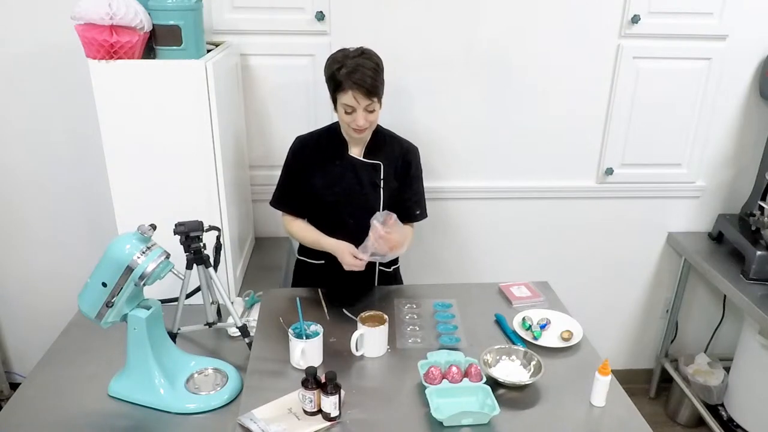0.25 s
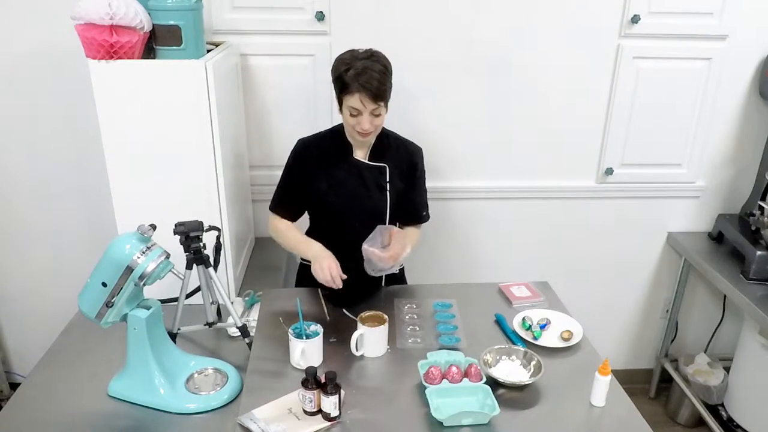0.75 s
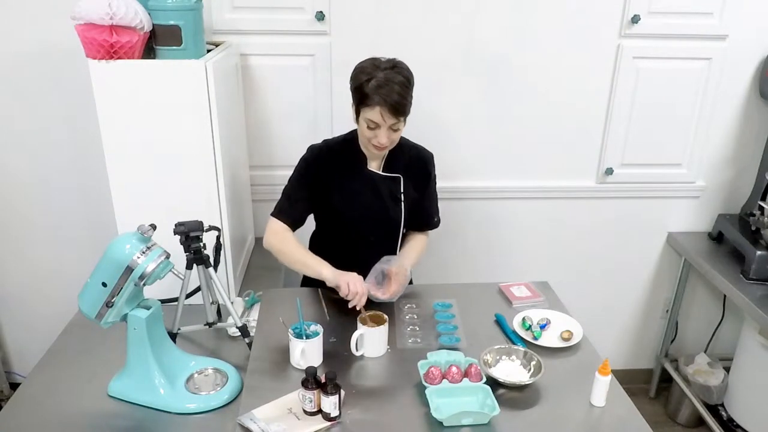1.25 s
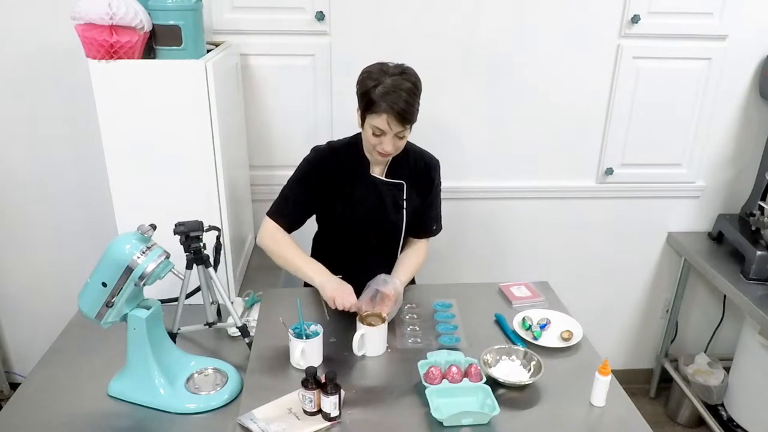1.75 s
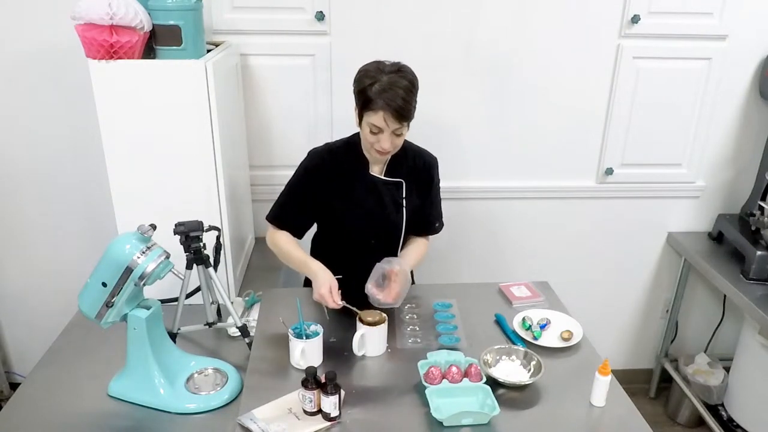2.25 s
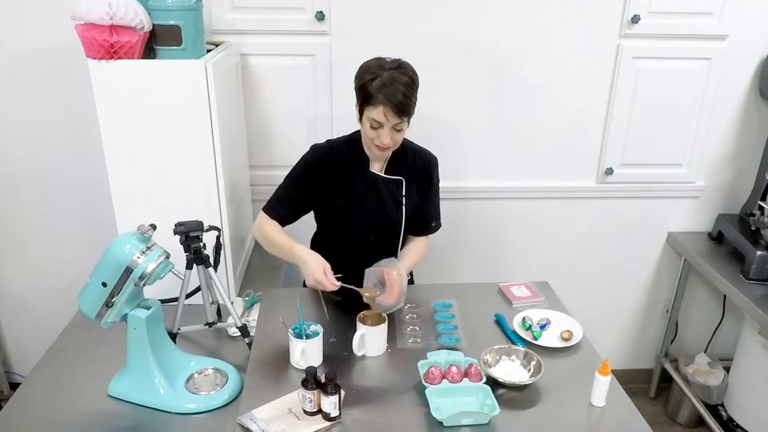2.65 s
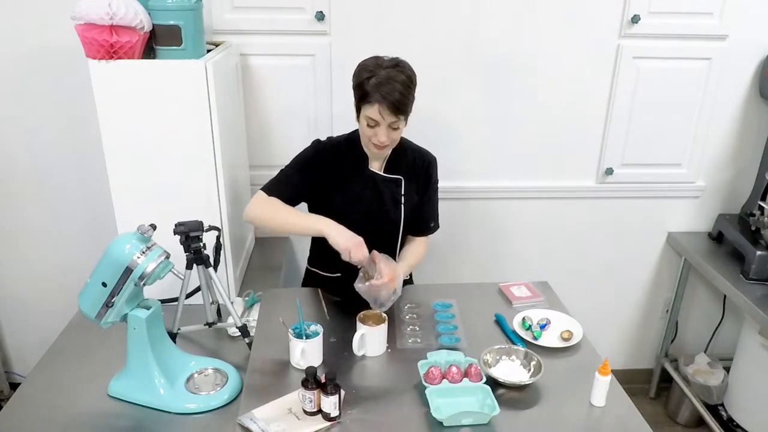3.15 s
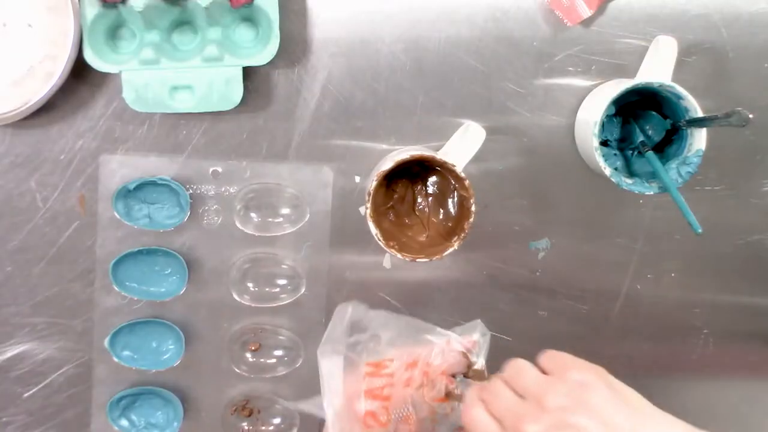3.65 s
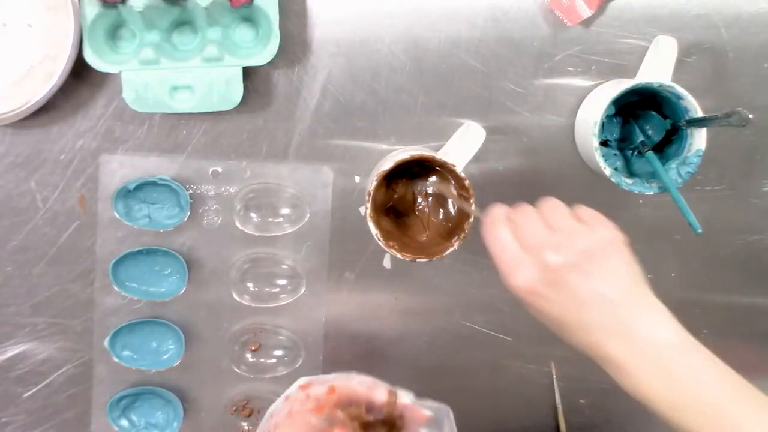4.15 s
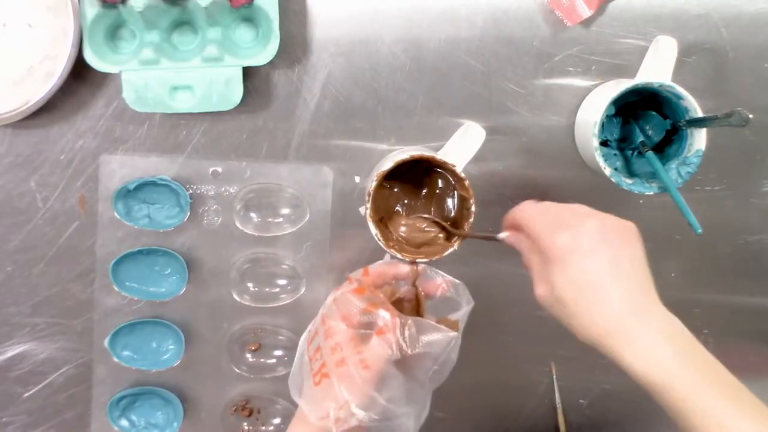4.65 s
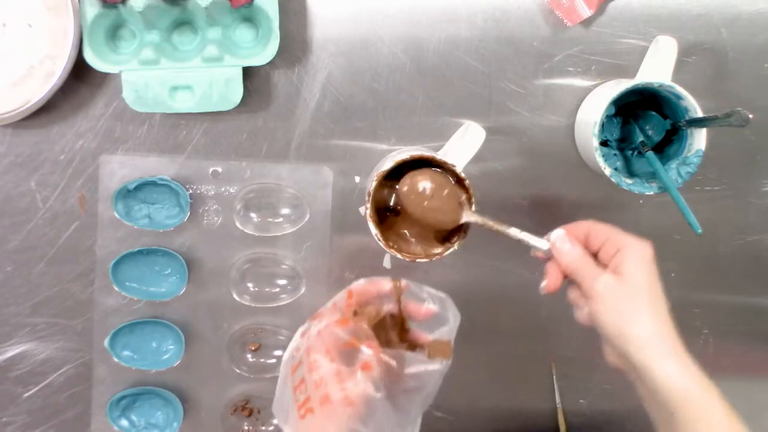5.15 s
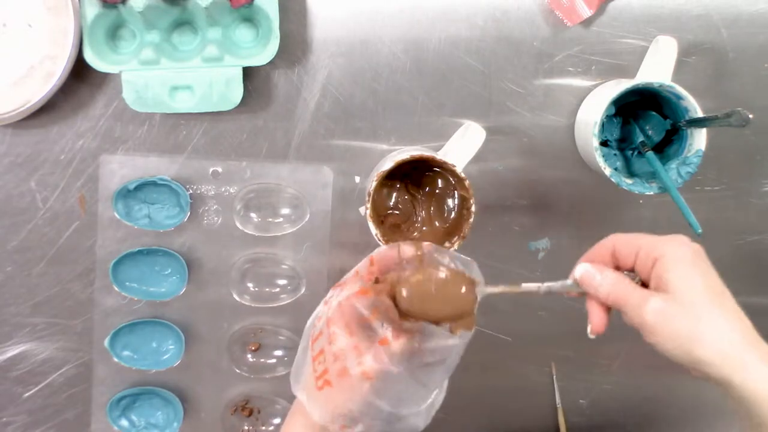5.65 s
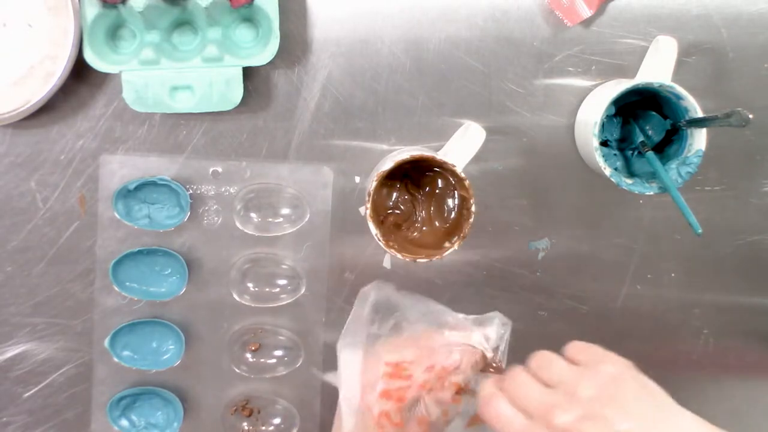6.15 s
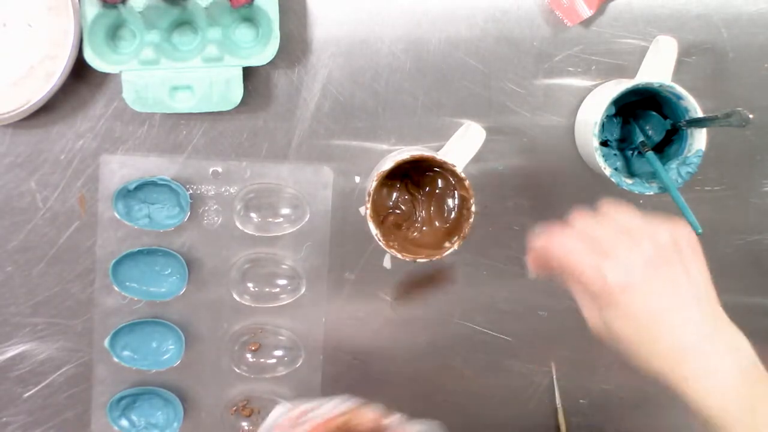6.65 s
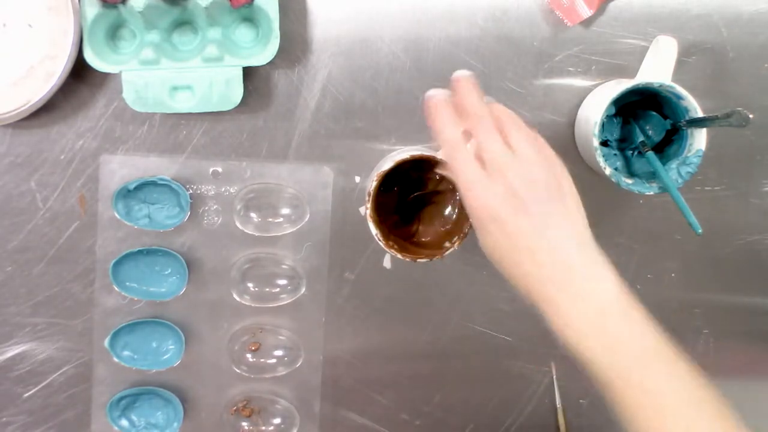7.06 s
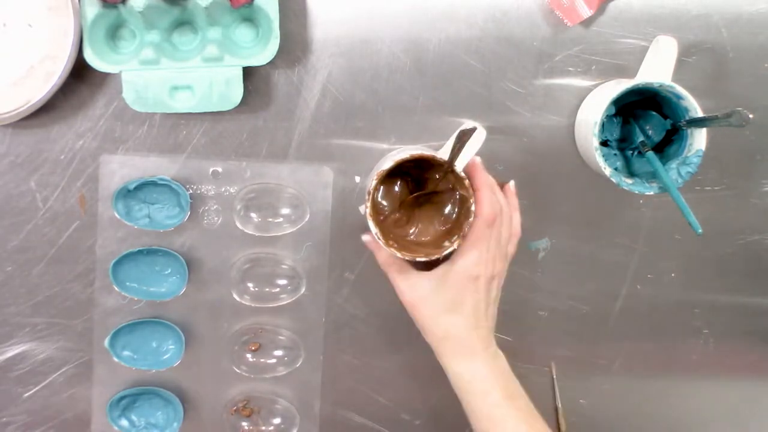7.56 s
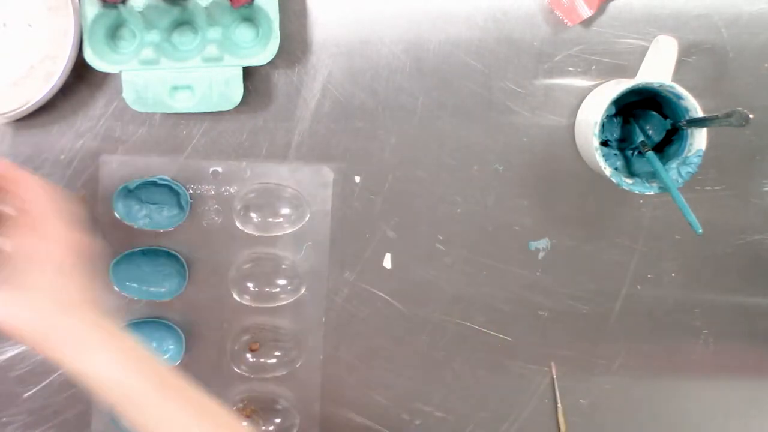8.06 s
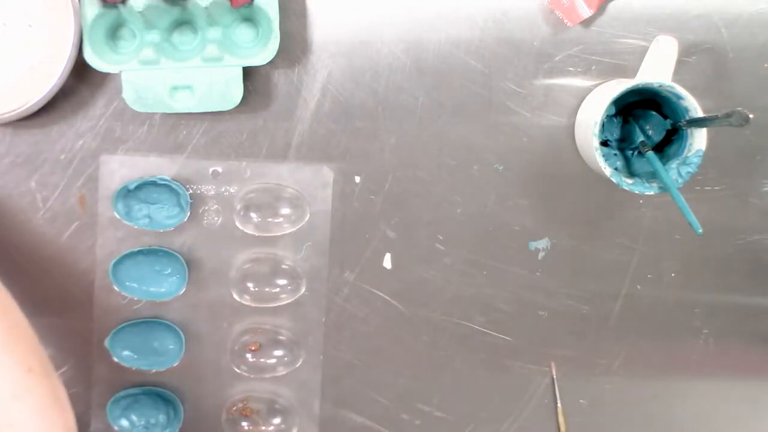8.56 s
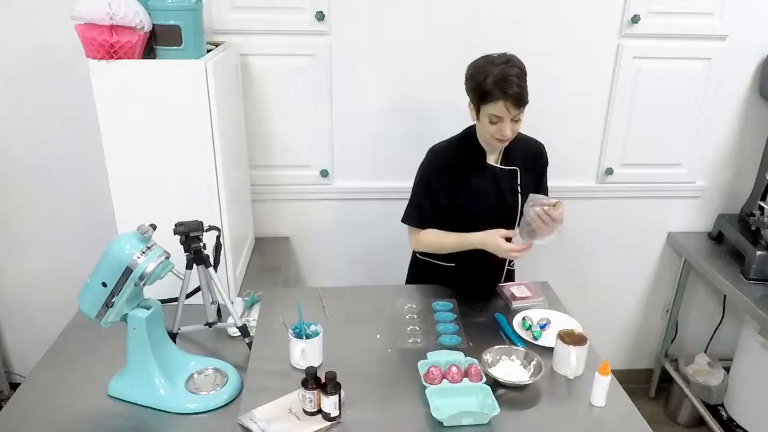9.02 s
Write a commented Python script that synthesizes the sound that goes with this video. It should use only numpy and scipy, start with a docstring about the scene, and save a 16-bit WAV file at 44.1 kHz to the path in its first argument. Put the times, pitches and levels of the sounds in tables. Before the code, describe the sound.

A thin plastic bag rustles and crackles close to the microphone as it is opened, filled and squeezed. The crinkling comes in uneven swells dotted with sharp snaps, loudest around three and six seconds. Near the end a spoon clinks in a mug, and the mug is set down with two ringing knocks on a steel table before the crinkling picks up again. A refrigerator hums under faint hiss in a slightly reflective kitchen.

```python
"""A thin plastic bag crackles as hands open, fill and squeeze it over a steel kitchen table.
Its creases buckle, in swarms and in single loud snaps, and film slides on film. A spoon clinks in a
lifted mug, which is set down with two loud knocks; mug and table ring in their damped normal modes.
The walls reflect these sounds, and a refrigerator hums under the room hiss. A close microphone with
an asymmetric input stage answers every sharp sound with a short low push."""
import sys
import numpy as np
from scipy import signal
from scipy.io import wavfile
from scipy.ndimage import uniform_filter1d

SR = 44100
rng = np.random.default_rng(int(sys.argv[2]) if len(sys.argv) > 2 else 0)


def master(y):
    """Save y as 16-bit WAV."""
    cut = np.clip(np.atleast_2d(y).T, -1, 1)
    pcm = np.round(cut * 32767)  # scale
    wavfile.write(sys.argv[1], SR, pcm.astype(np.int16))


N = 409688

# The hands' activity between crumples. Each row: time in seconds, level in dB, dull part relative
# to bright part in dB, sliding share of the power from 0 to 1.
HANDLING = [(0, -50.5, -10.5, 0.8), (0.15, -53.5, -10.5, 0.72), (0.55, -58, -8.5, 0.56),
            (0.72, -63, -8.5, 0.46), (0.9, -67.5, -8.5, .2), (1.3, -61.5, -8, .2), (1.42, -47, -6.5, 0.48),
            (1.72, -55.5, -4.5, 0.44), (2.3, -51, -8, 0.45), (2.7, -58, -5, 0.33), (3.1, -49.5, -8, 0.42),
            (3.56, -38, -9.5, 0.44), (4.1, -47.5, -5, 0), (4.5, -44, -6.5, 0.17), (4.75, -67, -6.5, 0.16),
            (5.3, -48.5, -4, 0.25), (5.7, -48.5, -5.5, 0.3), (6.1, -40.5, -9, 0.48), (6.5, -44.5, -5, 0.25),
            (6.8, -52, -4.5, 0.03), (7.0, -65, -4, 0.35), (7.75, -52, 2, 0.63), (7.9, -56, -15, .7),
            (8.5, -64, -6.5, 0.48), (8.9, -54.5, 3, 0.14), (9.1, -46, -5.5, 0.25), (9.29, -34, -9.5, 0.58)]
# A hand closes and a swarm of creases swells and dies. Each row: peak time in seconds, level in dB,
# seconds to swell by 20 dB, seconds to fade by 20 dB.
CRUMPLES = [(0.24, -36, 0.15, 0.32), (0.39, -40.5, 0.18, 0.25), (0.52, -45.5, .3, 0.024),
            (0.61, -44.5, .06, 0.24), (0.68, -46.5, .2, 0.036), (1.018, -57, 0.26, 0.43),
            (1.43, -33, 0.014, 0.04), (1.519, -31.5, 0.064, .13), (1.602, -33, 0.04, 0.11),
            (2.01, -48.5, 0.22, 0.065), (3.032, -30.5, 0.13, 0.082), (3.147, -35.5, 0.045, 0.071),
            (3.282, -19.5, 0.089, 0.19), (3.342, -23, 0.12, .12), (3.801, -32.5, 0.14, 0.2),
            (3.905, -32.5, 0.063, 0.18), (3.995, -27.5, 0.029, 0.029), (4.088, -36.5, 0.11, 0.13),
            (4.295, -44.5, .1, 0.14), (4.96, -49, 0.37, 0.19), (5.09, -44.5, 0.098, 0.31),
            (5.284, -47, 0.027, 0.36), (5.498, -50.5, 0.077, 0.067), (5.679, -34, 0.055, 0.076),
            (5.769, -31, 0.046, 0.058), (5.87, -33, 0.1, .2), (5.941, -27, .06, 0.22),
            (5.982, -25.5, 0.2, 0.073), (6.176, -36.5, 0.15, 0.077), (6.373, -32, 0.056, 0.053),
            (6.541, -34, 0.035, 0.05), (6.633, -54, 0.05, .12), (6.715, -41, 0.091, 0.031),
            (7.134, -37, 0.011, 0.026), (8.551, -40, 0.0079, 0.12), (8.725, -34, 0.037, 0.095),
            (8.838, -43.5, 0.11, 0.048), (8.934, -37.5, 0.018, 0.039), (9.14, -31.5, 0.066, 0.19)]
# Creases that buckle loudly. Each row: start in seconds, nominal peak in dB, pitch of the film patch
# in Hz, dull part relative to bright part in dB.
SNAPS = [(1.385, -42, 2530, -15), (1.4224, -15, 10700, -11), (1.4671, -18, 1700, -14),
         (1.491, -22, 1720, -10), (1.5035, -20, 4570, -11), (1.5274, -9, 7770, -13),
         (1.557, -12.5, 11000, -10), (1.5941, -14, 4390, -17), (1.6227, -16.5, 4510, -15),
         (1.9346, -19.5, 4360, -10), (2.0028, -21.5, 9720, -11), (2.0772, -26, 1590, -10),
         (2.1131, -23, 2850, -9.5), (2.138, -26.5, 4880, -11), (2.1577, -24, 3960, -14),
         (2.22, -24, 2430, -11), (2.2886, -19.5, 7170, -11), (2.3163, -19.5, 6050, -11.5),
         (2.3424, -21, 3060, -12), (2.4334, -22.5, 9500, -11), (2.5008, -28, 1670, -9),
         (2.563, -29, 7300, -4), (2.6055, -31, 10200, -10), (2.694, -29.5, 5700, -4),
         (2.811, -19.5, 1730, -8), (2.9627, -27, 1630, -13), (3.03, -12.5, 11300, -20),
         (3.052, -16.5, 3400, -12), (3.1228, -26, 6270, -14), (3.1916, -20, 10800, -9),
         (3.2041, -19.5, 4610, -8), (3.226, -27, 4860, -13), (3.2545, -5.5, 1590, -16),
         (3.417, -12, 11000, -9), (3.5508, -28, 4420, -18), (3.5981, -13.5, 12000, -13),
         (3.6334, -15, 6800, -12), (3.654, -19, 8730, -13), (3.689, -14, 6050, -14), (3.7, -7, 4800, -15),
         (3.724, -18, 7000, -11), (3.753, -12.5, 5870, -12), (3.7888, -16, 4100, -13),
         (3.8857, -15, 3130, -13), (3.922, -11.5, 5570, -10), (3.9663, -25, 1600, -12),
         (3.9836, -11.5, 2080, -11.5), (4.0437, -24, 1600, -13), (4.0839, -18.5, 1620, -12),
         (4.1145, -23, 1750, -13), (4.142, -19.5, 2900, -13), (4.22, -18, 1830, -14),
         (4.2617, -19.5, 2810, -10.5), (4.2926, -25.5, 8080, -17), (4.3054, -19, 1960, -14),
         (4.4119, -26, 2720, -10), (4.449, -18, 2010, -11), (4.557, -22.5, 1600, -16),
         (4.592, -22.5, 2770, -15), (4.7565, -30, 7600, -13), (4.8293, -31, 1810, -13),
         (4.8758, -30, 1610, -7), (5.03, -26, 10500, -9), (5.0721, -19.5, 2460, -10),
         (5.1016, -8.5, 3240, -10.5), (5.1786, -31, 3000, -7), (5.1946, -24, 9350, -14),
         (5.233, -25, 1600, -14), (5.2811, -25, 1670, -10), (5.3093, -20.5, 3360, -17),
         (5.4874, -21.5, 1740, -18), (5.5712, -29.5, 1820, -7), (5.6064, -43, 1600, -13),
         (5.623, -15.5, 1690, -12.5), (5.658, -18.5, 4520, -10), (5.677, -20, 2680, -10),
         (5.7169, -20, 6000, -13), (5.7568, -14.5, 2550, -14), (5.7712, -9, 2970, -14.5),
         (5.868, -24, 4950, -13), (5.9253, -21, 7370, -13), (5.9828, -3.5, 9800, -16),
         (6.114, -26, 2440, -13), (6.1684, -15, 4570, -13), (6.2866, -25, 4520, -13),
         (6.3121, -22.5, 5130, -13), (6.346, -23, 3550, -8), (6.3598, -19, 5520, -13),
         (6.3769, -11, 2060, -15), (6.3989, -15, 2180, -13), (6.4732, -17.5, 3500, -11),
         (6.5082, -11.5, 4830, -4), (6.526, -26, 5010, -13), (6.54, -24, 1630, -13),
         (6.624, -28, 3070, -13), (6.6812, -14, 1930, -11.5), (6.7224, -21, 13600, -10),
         (6.7438, -15.5, 5070, -5), (6.832, -16.5, 3030, -11), (6.8613, -26, 5630, -11),
         (6.9968, -35, 1670, -4), (7.116, -23, 1870, -7), (7.1401, -17, 5330, -13), (7.195, -26, 1790, -10),
         (7.221, -25, 2870, -10), (7.3023, -29, 1800, -12), (7.3272, -19, 1680, -12),
         (7.415, -25.5, 7990, -10), (7.6163, -20, 5700, -9), (7.7517, -16.5, 5240, -6),
         (7.9117, -26.5, 8480, -5), (8.0087, -25.5, 14000, -9.5), (8.3016, -24.5, 4170, -14),
         (8.3804, -41, 7350, -10), (8.4138, -44, 7140, -10), (8.5401, -22, 1640, -10),
         (8.574, -17, 2100, -12), (8.7022, -22.5, 3700, -7), (8.7177, -17, 1620, -10),
         (8.8289, -25, 1850, -10), (8.9222, -26, 1740, -12), (8.9392, -26, 1720, -3),
         (8.9621, -17, 1770, -10), (8.9927, -12.5, 1900, -9), (9.042, -29, 1640, -4),
         (9.0629, -18.5, 2080, -10.5), (9.0893, -25, 2290, -10), (9.1227, -12, 2360, -11)]
# The bright part of a crease. Each row: frequency in Hz, relative spectral density in dB.
FILM_SPECTRUM = [(400, -40), (700, -12), (1100, -7), (1600, -5), (2100, -3.5), (3300, -1), (5000, 0),
                 (7000, 0), (9000, -.5), (12000, -1), (16000, -3)]
# The dull part, from the bag as a whole. Each row: frequency in Hz, relative spectral density in dB.
BAG_SPECTRUM = [(90, -33), (150, -10.5), (320, -10.5), (550, -7), (1000, -6.5), (1600, -3.5), (3000, -28.5),
                (6000, -64)]
# The spoon shifts in the mug. Each row: start in seconds, peak in dB, favoured pitch in Hz,
# spread in octaves.
SPOON_CLINKS = [(8.0522, -15, 2400, 1.0), (8.1015, -37, 1400, .3), (8.1434, -29, 1720, .06)]
# The mug's modes. Each row: frequency in Hz, relative level in dB, seconds to decay by 60 dB.
MUG_MODES = [(1518, -9, .09), (1710, -14, .035), (2420, 0, .03), (2353, -20, .25), (2638, -20, .2),
             (2789, -20, .15), (7343, -22, .05)]
# Blows on the table. Each row: start in seconds, peak in dB, favoured pitch in Hz, spread in octaves.
TABLE_KNOCKS = [(1.942, -43, 215, 0.26), (4.509, -34, 232, 0.35), (8.541, -14.5, 400, 2.2),
                (8.572, -33, 300, 1.9), (8.7155, -13.5, 403, 2), (8.751, -25, 400, 1.2),
                (8.992, -34, 210, 0.14)]
# The steel top's modes. Each row: frequency in Hz, relative level in dB, seconds to decay by 60 dB.
TABLE_MODES = [(112, -21.5, 0.18), (194, -39, 0.19), (215.7, 1, 0.3), (309.7, -9, 0.54), (374, -1, 0.29),
               (440, -33, 0.43), (530, -14, 0.66), (582, 0.5, 0.4), (620, -32, 0.81), (744, -0.5, 0.52),
               (913, -9, 0.32), (1030, -11, 1), (1186, -5, 0.17), (1510, -6, 0.38), (1930, -8.5, 0.78),
               (2680, -1, 0.2)]
# The compressor's tones. Each row: frequency in Hz, rms level in dB before the background gain.
HUM_TONES = [(120.3, -48.5), (140.5, -57)]
# The room hiss. Each row: frequency in Hz, relative spectral density in dB.
HISS_SPECTRUM = [(20, -3), (40, 10), (70, -9), (100, 4), (170, -9.5), (300, -11.5), (700, -16), (4000, -27),
                 (7300, -27.5), (15500, -34)]
# The gain on hum and hiss together. Each row: time in seconds, gain in dB.
BACKGROUND_GAIN = [(0, -17), (1.36, -19.5), (1.5, 0.5), (5, 0), (8.5, 0), (9.0, 0.5), (9.1, -6.5),
                   (9.29, -5)]


def bag_rustle():
    """Buckling and friction: swarms of small creases add in power to the hiss of film sliding on film."""
    handling_db, dull_db, slide_share = curves(HANDLING)
    level_db = add_crumples(handling_db)
    creases = crease_swarm(level_db)
    friction = evened(amp(6 * drift(150)) * rng.standard_normal(N))
    drive = np.sqrt(1 - slide_share) * creases + np.sqrt(slide_share) * friction
    return amp(level_db) * (colour(drive, FILM_SPECTRUM) + amp(dull_db) * colour(drive, BAG_SPECTRUM))


def add_crumples(handling_db):
    """Incoherent sources add in power: handling and crumples give the rustle's level in dB."""
    t = np.arange(N) / SR
    power = amp(2 * handling_db)
    for peak_s, db, swell_s, fade_s in CRUMPLES:
        drop_db = 20 * np.where(t < peak_s, (peak_s - t) / swell_s, (t - peak_s) / fade_s)
        power += amp(2 * (db - drop_db))
    return 10 * np.log10(power)


def crease_swarm(level_db):
    """Shot noise: small creases buckle at random instants, more often as the hands work harder."""
    per_s = 380 * amp(.6 * (level_db + 43.5) + 4.5 * drift(60))  # creases set each other off in clumps
    sizes = amp(3.2 * np.minimum(rng.exponential(1, N), 5))
    impulses = sizes * (rng.random(N) < per_s / SR)
    patch = rng.integers(0, 24, N)
    creases = np.zeros(N)
    for k, hz in enumerate(np.geomspace(2000, 14500, 24)):
        crack = buckle(rng.standard_normal(900), hz, t60=.007, tuned=1.1)
        creases += signal.oaconvolve(impulses * (patch == k), crack)[:N]
    local_power = uniform_filter1d(creases ** 2, 9000)
    return creases / np.sqrt(local_power + 1e-3)


def bag_snaps():
    """Snap-through buckling: one loud crease excites both the bright film and the dull bag as a whole."""
    bright, dull = np.zeros((2, N))
    crest_factor = 2
    for start_s, db, hz, dull_db in SNAPS:
        t60 = np.clip(.013 * np.exp(.35 * rng.standard_normal()), .002, .05)
        crack = amp(db) / crest_factor * buckle(rng.standard_normal(1800), hz, t60, tuned=.73)
        add(bright, start_s, crack)
        add(dull, start_s, amp(dull_db) * crack)
    return colour(bright, FILM_SPECTRUM) + colour(dull, BAG_SPECTRUM)


def buckle(noise, hz, t60, tuned):
    """A damped transient: a crease flips with a crack, partly tuned to the patch of film that moves."""
    t, rise_s = np.arange(len(noise)) / SR, .0005
    envelope = np.minimum(t / rise_s, 1) * amp(-60 * np.maximum(t - rise_s, 0) / t60)
    crack = envelope * (evened(noise) + tuned * evened(resonance(noise, hz, .4 * hz)))
    return crack * np.linalg.norm(envelope) / np.linalg.norm(crack)


def mug_and_table():
    """Impact excitation: the spoon sets the mug ringing, and knocks set the steel top ringing."""
    out = np.zeros(N)
    for start_s, db, hz, octaves in SPOON_CLINKS:
        add(out, start_s, amp(db) * struck(MUG_MODES, hz, octaves, scatter=.15, samples=8000))
    for start_s, db, hz, octaves in TABLE_KNOCKS:
        add(out, start_s, amp(db) * struck(TABLE_MODES, hz, octaves, scatter=1.3, samples=24000))
    return out


def struck(modes, favoured_hz, octaves, scatter, samples):
    """Modal superposition: a blow rings the modes near its favoured pitch; each decays exponentially."""
    t = np.arange(samples) / SR
    noise = rng.standard_normal(samples)
    out = np.zeros(samples)
    for hz, db, t60 in modes:
        weak_modes = evened(resonance(noise, hz, .2 * hz))  # noise stands for the many modes between
        excitation = 1 / (1 + (np.log2(hz / favoured_hz) / octaves) ** 2)
        out += excitation * amp(db - 60 * t / t60) * (np.sin(2 * np.pi * hz * t) + scatter * weak_modes)
    return out / abs(out).max()


def wall_echoes(x):
    """Reverberation: sparse reflections from hard walls grow duller, as the treble decays faster."""
    gap_samples, bright_t60, dull_t60 = 300, .15, .34
    t = np.arange(gap_samples, 14000) / SR
    reflections = rng.choice([-1., 1.], len(t)) * (rng.random(len(t)) < .05)
    bright = reflections * amp(-60 * t / bright_t60)
    dull = signal.lfilter([.3], [1, -.7], reflections) * amp(-60 * t / dull_t60)
    response = np.r_[np.zeros(gap_samples), bright + 1.5 * dull]
    return signal.oaconvolve(x, response / np.linalg.norm(response))[:N]


def refrigerator_hum():
    """Beating: two compressor tones interfere, each wavering slightly in level and phase."""
    t = np.arange(N) / SR
    hum = np.zeros(N)
    for hz, db in HUM_TONES:
        amplitude = np.sqrt(2) * amp(db + .8 * drift(10))
        cycles = hz * t + .015 * drift(10)
        hum += amplitude * np.sin(2 * np.pi * cycles)
    return hum


def room_hiss():
    """Broadband noise, strongest in the bass, wanders slightly in level."""
    return amp(-50.5 + .98 * drift(1.716)) * evened(colour(rng.standard_normal(N), HISS_SPECTRUM))


def amp(db):
    """The amplitude ratio for a level in dB."""
    return 10 ** (np.asarray(db) / 20)


def evened(x):
    """Normalisation to unit rms."""
    return x / np.sqrt(np.mean(x ** 2) + 1e-20)


def curves(rows):
    """Linear interpolation of a timed table's columns at every sample."""
    times, *columns = np.transpose(rows)
    return [np.interp(np.arange(N) / SR, times, column) for column in columns]


def colour(x, spectrum):
    """A minimum-phase filter of unit energy imposes the shape of a spectrum."""
    hz, db = np.transpose(spectrum)
    bin_hz = abs(np.fft.fftfreq(4096, 1 / SR))
    gain_db = np.maximum(np.interp(np.log(bin_hz + 1), np.log(hz + 1), db), -70)
    log_response = np.conj(signal.hilbert(gain_db * np.log(10) / 20))
    taps = np.fft.ifft(np.exp(log_response)).real[:2048]
    return signal.oaconvolve(x, taps / np.linalg.norm(taps))[:len(x)]


def resonance(x, hz, width_hz):
    """The response of a damped oscillator driven by x."""
    radius = np.exp(-np.pi * width_hz / SR)
    return signal.lfilter([1 - radius], [1, -2 * radius * np.cos(2 * np.pi * hz / SR), radius ** 2], x)


def drift(per_s):
    """Random modulation: Gaussian values joined by straight lines."""
    return np.interp(np.arange(N) / SR * per_s, np.arange(2000), rng.standard_normal(2000))


def add(mix, start_s, sound):
    """Superposition of a sound on the mix from its start time."""
    part = mix[round(start_s * SR):][:len(sound)]
    part += sound[:len(part)]


def scene():
    """Direct sound, reflections and background superpose in one channel."""
    direct = bag_rustle() + bag_snaps() + mug_and_table()
    echoes = amp(-16) * wall_echoes(direct)
    background = amp(curves(BACKGROUND_GAIN)[0]) * (refrigerator_hum() + room_hiss())
    return (direct + echoes + background)[None]


def record(dry):
    """Rectification: an asymmetric input stage turns the treble's envelope into a downward push."""
    treble = signal.sosfilt(signal.butter(2, 800, "high", fs=SR, output="sos"), dry)
    hold = np.exp(-1 / (.0087 * SR))  # time constant of 8.7 ms
    envelope = signal.lfilter([1 - hold], [1, -hold], abs(treble))
    offset = .13 * np.log1p(envelope / .027)  # loud cracks push less than in proportion
    push = signal.sosfilt(signal.butter(2, 14, "high", fs=SR, output="sos"), offset)
    band_limit = signal.firwin(511, 16050, window=("kaiser", 9), fs=SR)
    return signal.oaconvolve(dry - push, band_limit[None], "same")


dry = scene()
out = record(dry)
master(out)
```